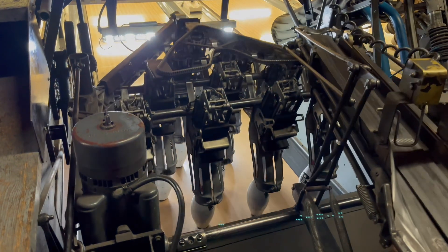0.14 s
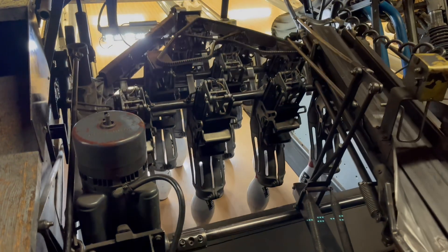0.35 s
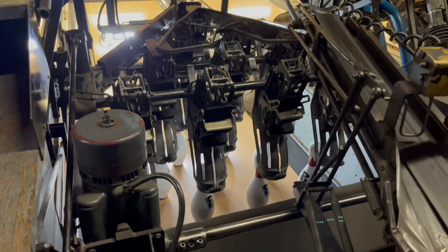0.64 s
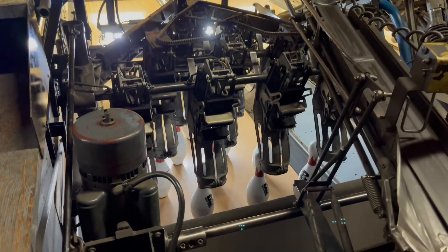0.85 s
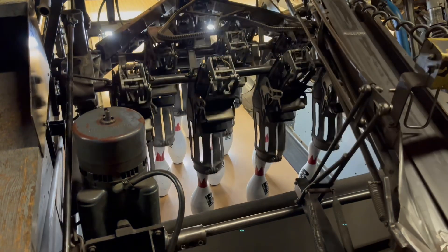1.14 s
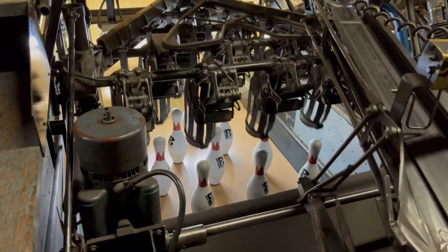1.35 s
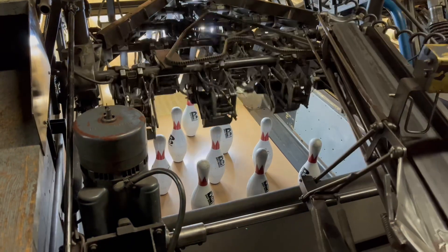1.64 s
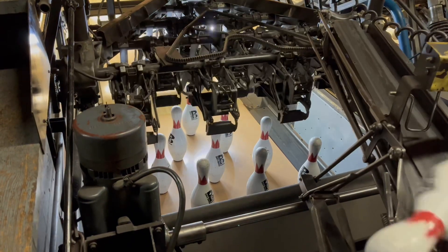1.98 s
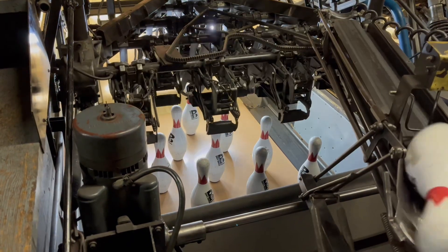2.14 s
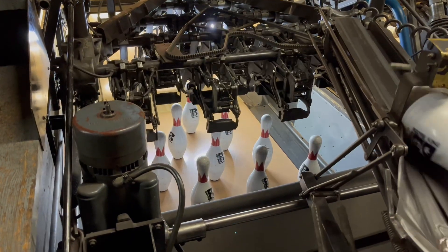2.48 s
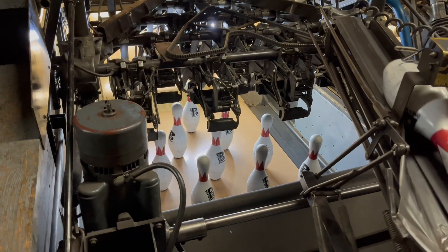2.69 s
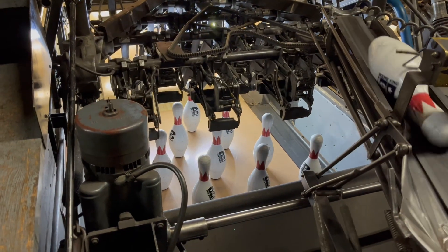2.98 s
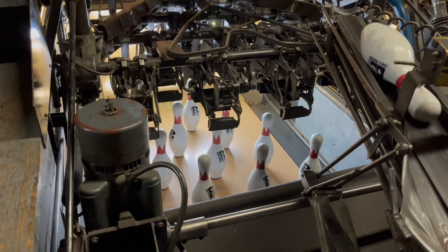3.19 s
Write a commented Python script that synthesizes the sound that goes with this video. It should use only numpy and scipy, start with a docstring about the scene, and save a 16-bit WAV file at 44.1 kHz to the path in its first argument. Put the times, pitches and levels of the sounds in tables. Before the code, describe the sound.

Bowling pinsetter in a hard machine room, close stereo microphone: early metal snaps, a ringing release, scraping deck, dense hollow pin knocks and low thuds, a brief rubbing squeal, drive rumble and rattle throughout.

```python
"""Steel latches clack on a bowling pinsetter, heard from on top of the machine: noise blows and clean rings.
Pins knock about in the pit behind, each a noise blow with three decaying tones.
One pin rubs and squeals up the conveyor: ringing chatter and wavering friction tones.
The deck lifts with a scrape and hiss of tiny contacts, a whistle and a squeak; heavy parts thud.
Beneath, shaped noise and chatter make the drive's rumble and rattle; tones and noise make the motor."""
import sys
import numpy as np
from scipy import signal
from scipy.fft import rfft, irfft, next_fast_len
from scipy.io import wavfile

SR = 44100
rng = np.random.default_rng(int(sys.argv[2]) if len(sys.argv) > 2 else 0)


def materialize(psi):
    """Save the field psi as 16-bit PCM at rate SR to the path in sys.argv[1].

    A 1-D psi becomes a single channel; in a 2-D psi each row is a channel.
    """
    bounded = np.clip(np.atleast_2d(psi).T, -1, 1)
    quanta = np.round(bounded * 32767).astype(np.int16)
    wavfile.write(sys.argv[1], SR, quanta)


N = 146412
TIME = np.arange(N) / SR


def from_db(db):
    """Decibels to gain."""
    return 10 ** (np.asarray(db) / 20)


def rms_one(x):
    """Scale to unit rms."""
    return x / np.sqrt(np.mean(x ** 2) + 1e-20)


def level(rows):
    """Gain over time from (t/s, level/dB) rows."""
    return from_db(np.interp(TIME, *np.transpose(rows)))


def at_hz(points, hz):
    """Read a table on a log-frequency axis."""
    f, v = np.transpose(points)
    return np.interp(np.log(hz + 1), np.log(f), v)


def noise():
    """White noise for the common and the differing part."""
    return rng.standard_normal((2, N))


def drift(rate):
    """Slow random wander, mostly below the rate in Hz; rms 1."""
    hz = np.arange(N // 2 + 1) * SR / N
    return rms_one(irfft(rfft(rng.standard_normal(N)) / (1 + (hz / rate) ** 2), N))


def colour(x, db_at):
    """Causal (minimum-phase) filter with the gain db_at(Hz)."""
    n = x.shape[-1]
    half = next_fast_len(n // 2 + SR // 20)
    hz = np.arange(half + 1) * SR / (2 * half)
    cepstrum = irfft(np.log(from_db(db_at(hz))))
    # fold the cepstrum forward in time, which makes the filter minimum-phase
    cepstrum[1:half] *= 2
    cepstrum[half + 1:] = 0
    return irfft(rfft(x, 2 * half) * np.exp(rfft(cepstrum)))[..., :n]


def shaped(x, spectrum):
    """Filter by a spectrum table; rms 1."""
    return rms_one(colour(x, lambda hz: at_hz(spectrum, hz)))


def above(hz, corner_hz):
    """Shelf shape: 0 below the corner, 1 above."""
    return 1 - 1 / (1 + (hz / corner_hz) ** 4)


PART_Q = 6.3  # sharpness of a part's own resonance


def peak(hz, centre_hz):
    """Shape of a part's own resonance, 1 at its centre."""
    return 1 / (1 + (PART_Q * (hz / centre_hz - 1)) ** 2)


def ring(x, modes):
    """Let x excite two-pole resonators, one per decaying mode."""
    out = 0
    for hz, db, t60 in modes:
        radius = from_db(-60 / (t60 * SR))
        turn = 2 * np.pi * hz / SR
        poles = [1, -2 * radius * np.cos(turn), radius * radius]
        out = out + from_db(db) * signal.lfilter([1, 0, -1], poles, x + 1e-18)
    return out


# ringing of the steel frame: f/Hz, relative drive level/dB, t60/s
FRAME_MODES = [(830, 16, 0.14), (1064, 9.5, 0.076), (1379, 9.5, 0.12), (1710, 5, 0.2), (2476, 2, 0.21),
               (3280, 0.5, 0.1), (3580, 3.5, 0.06), (3650, 3, 0.08), (4170, -5, 0.1), (4160, -3, 0.081),
               (4680, -11, 0.083), (4770, 2, 0.11)]


def with_frame(x, ring_db):
    """A sound plus the ringing it raises in the steel frame, set relative to the sound's own level."""
    return x + from_db(ring_db) * x.std() * rms_one(ring(x, FRAME_MODES))


def chatter(per_s, spread_db, t60):
    """Random small contacts, each a brief decaying burst of noise; rms 1."""
    contacts = rng.random(N) < per_s / SR
    strength = from_db(spread_db * np.minimum(rng.exponential(1, N), 3))
    energy_decay = from_db(-60 / (t60 * SR)) ** 2
    energy = signal.lfilter([1], [1, -energy_decay], contacts * strength ** 2 + 1e-12)
    return rms_one(np.sqrt(energy) * noise())


DIRECT_DB, DIRECT_S = -11, .0014  # the contact's click: level re the early burst, and delay


def blow(s, db, attack, t60, tail_db, tail_t60, db_at, direct_db=DIRECT_DB):
    """One blow: the direct contact, a dense burst of near reflections, then a tail in the machine room."""
    t = TIME[:SR // 2]
    early = (1 - np.exp(-t / attack)) * from_db(-60 * t / t60)
    tail = (1 - np.exp(-t / t60)) * from_db(tail_db - 60 * t / tail_t60)
    envelope = np.hypot(early, tail)
    force = envelope * rng.standard_normal((2, len(t)))
    force[0, int(DIRECT_S * SR)] += from_db(direct_db) * np.sqrt(np.sum(early ** 2))
    burst = colour(force, db_at)
    # the common part carries the energy of the envelope at the blow's level
    burst *= from_db(db) * np.sqrt(np.sum(envelope ** 2) / np.sum(burst[0] ** 2))
    return np.pad(burst, ((0, 0), (int(s * SR), N)))[:, :N]


RING_RISE_S = .0005


def struck(s, modes):
    """Clean ring of (f/Hz, level/dB, t60/s) modes from time s on, in the common part only."""
    t = np.maximum(TIME - s, 0)
    swell = 1 - np.exp(-t / RING_RISE_S)
    tones = sum(from_db(db - 60 * t / t60) * np.sin(2 * np.pi * hz * t) for hz, db, t60 in modes)
    return np.array([[1], [0]]) * swell * tones


SMEAR_S, SMEAR_HZ = 0.001984, 2920  # delay of the lowest bass; frequency where it has halved


def dispersed(x):
    """Bending waves carry the treble ahead of the bass, so a sharp contact is smeared a little."""
    hz = np.arange(N // 2 + 1) * SR / N
    delay = SMEAR_S / (1 + hz / SMEAR_HZ)
    return irfft(rfft(x) * np.exp(-2j * np.pi * np.cumsum(delay) * SR / N), N)


GRAIN_DB, GRAIN_HZ = 2.2, 45  # spread of the random gains, and their spacing in frequency


def grained(x):
    """Random fixed ripple over the spectrum, giving the noise a slightly tonal grain; rms 1."""
    grid = np.arange(1200) * GRAIN_HZ
    gains_db = GRAIN_DB * rng.standard_normal(len(grid))
    return rms_one(colour(x, lambda hz: np.interp(hz, grid, gains_db)))


UNEVEN_DB, UNEVEN_PER_S = 2.2, 16  # rms depth and rate of the swelling


def uneven(x):
    """The contact shifts as it slides, so each third-octave band swells and fades by itself; rms 1."""
    octave = np.log2(np.clip(np.arange(N // 2 + 1) * SR / N, 1000, 8000) / 1000)
    spectrum = rfft(x)
    out = 0
    for k in range(10):
        band = irfft(spectrum * np.maximum(1 - abs(3 * octave - k), 0), N)
        out = out + from_db(UNEVEN_DB * drift(UNEVEN_PER_S)) * band
    return rms_one(out)


FLUTTER_DB = 4.5  # largest swing of the level either way


def singing(hz, waver):
    """A friction tone that wavers in pitch by the given share and flutters in level; rms 1."""
    phase = 2 * np.pi * np.cumsum(hz * (1 + waver * drift(31))) / SR
    parts = [from_db(FLUTTER_DB * np.tanh(drift(35))) * np.sin(phase + turn) for turn in (0, np.pi / 2)]
    return rms_one(np.array(parts))


# steel latches and linkages: t/s, level/dB, body shelf/dB, top shelf/dB, attack/s, t60/s,
# the part's own resonance f/Hz, its height/dB, frame ringing re the blow/dB
LATCH_BLOWS = [(0.1843,-25,6,-1,0.00059,0.034,4060,3,-11), (0.1933,-10.5,3,1,0.0003,0.03,3950,7,-9),
               (0.2184,-12.5,10,4,0.00015,0.03,3350,6,-5), (0.321,-21,-0.5,2.5,0.001,0.12,1740,20.5,-13),
               (0.352,-26.5,13,-7,0.0011,0.052,3030,7,-21), (0.5866,-33.5,16.5,-10,0.0061,0.48,3240,4.5,-9),
               (1.135,-30.5,19,-20,0.0042,0.29,3020,3,-9), (1.238,-29,17,3,.002,0.12,1700,12,-6),
               (1.3755,-11.5,9,-10,0.0008,0.062,950,3,-15), (1.5902,-22.5,-32,-3,0.0011,0.11,5480,5,-8),
               (1.723,-17.5,7,5,0.0026,0.089,11500,2,-28), (1.7398,-8,7,-7,0.00015,0.012,4380,9,-22),
               (1.755,-28,12,-14,.001,0.053,2530,9,-12), (2.129,-24,-5,-11,0.0023,0.035,1650,-1,-3),
               (2.463,-26,8.5,-21,0.0029,0.16,2600,0,-11), (2.77,-30,-3,-18,.001,0.043,4480,2,-17),
               (3.0251,-40.5,12,6,.002,0.17,10500,21,-13), (3.1753,-20.5,19.5,-9,0.0012,0.093,1750,2,-3),
               (3.288,-32,6,-4,0.0035,0.066,2750,12,-14)]
# spectrum of a steel contact: f/Hz, relative level/dB per Hz
CLACK_SPECTRUM = [(100, -16.5), (400, -33), (1000, -10.5), (1700, -6.5), (2600, -1.5), (3800, -3),
                  (4900, -1), (6500, -4), (11000, -5.5), (14000, -11.5)]
BODY_HZ, TOP_HZ = 1980, 8400  # shelf corners
CLACK_TAIL_DB, CLACK_TAIL_T60_S = -3, 0.19
FULL_TAIL_T60_S = .07  # contacts shorter than this put less energy into the room
CLACK_RING_DB, CLACK_RING_T60_S = 3.5, .018  # clean ring of the struck part, level re its blow


def latches():
    """Hard steel contacts: each part has its own resonance and sets the frame ringing."""
    out = 0
    for s, db, body, top, attack, t60, part_hz, part_db, ring_db in LATCH_BLOWS:
        def tone(hz):
            shelves = body * (1 - above(hz, BODY_HZ)) + top * above(hz, TOP_HZ)
            return at_hz(CLACK_SPECTRUM, hz) + shelves + part_db * peak(hz, part_hz)
        tail_db = CLACK_TAIL_DB + 10 * np.log10(min(t60 / FULL_TAIL_T60_S, 1))
        out = out + with_frame(blow(s, db, attack, t60, tail_db, CLACK_TAIL_T60_S, tone), ring_db)
        out = out + struck(s, [(part_hz, db + CLACK_RING_DB, CLACK_RING_T60_S)])
    return out


# modes of the deck's release catch: f/Hz, level/dB, t60/s
RELEASE_MODES = [(415,-19.5,.15), (656,-25,0.15), (1170,-28,.07), (1360,-38,.12), (2277,-31,.12),
                 (3020,-23,0.12), (3500,-21,0.11), (4700,-14,0.067)]
RELEASE_S = 1.3765


def release_catch():
    """The deck's release catch lets go and rings as a set of decaying sines."""
    return struck(RELEASE_S, RELEASE_MODES)


# pins knocking on each other and on the machine: t/s, level/dB, bass shelf/dB, edge shelf/dB,
# attack/s, t60/s, strongest resonance f/Hz
PIN_BLOWS = [(0.2214,-16.5,-3,3,0.0017,0.064,1000), (0.4516,-24,-8,-5,0.0022,0.17,823),
             (.478,-20,-4,-11,0.0031,0.14,700), (.526,-27,4,-11,0.0015,0.11,880),
             (1.245,-28,-2,2,0.0038,0.14,800), (1.313,-20,9,-23,0.0022,0.08,790),
             (1.377,-16.5,0,0,0.002,0.16,865), (1.4141,-17,-5,-4.5,0.0013,0.12,720),
             (1.5122,-9.5,-3.5,-11.5,0.0021,0.08,728), (1.5606,-14,2,-7,0.0013,0.11,595),
             (1.7403,-18,-1,-5,0.001,0.1,850), (1.754,-18,-1,-2,0.0025,0.18,700),
             (1.969,-17.5,9,14,0.0017,.04,368), (2.0545,-11,-4,-3,0.004,0.072,1007),
             (2.1113,-12,7.5,-3,0.0018,0.17,270), (2.131,-14.5,2,2.5,0.0012,0.11,550),
             (2.224,-19.5,9,-14,.001,0.022,690), (2.2643,-12.5,5,-4.5,0.00073,0.1,892),
             (2.415,-19.5,10,-25,0.0022,0.13,1120), (2.4613,-9,7.5,-7,0.0016,0.065,446),
             (2.4848,-11.5,-6,-17,0.00045,0.11,823), (2.532,-16,-20,-26,0.0025,0.049,484),
             (2.592,-18,-15,-3,0.0029,0.029,750), (2.644,-19,0,-8,0.0059,0.27,760),
             (2.766,-10,10.5,-1,0.003,0.038,283), (3.02,-20,-2,-7,0.0022,.1,820),
             (3.178,-17.5,-14,4,0.0018,0.15,1060)]
# spectrum of a knock: f/Hz, relative level/dB per Hz
KNOCK_SPECTRUM = [(60, -36), (170, -12), (320, -1), (600, -0.5), (850, -3), (1300, -3), (2000, -10.5),
                  (3500, -18.5), (8000, -33)]
# clean ring of a pin: multiple of the strongest resonance, level re the blow/dB, t60/s
PIN_RING = [(1, -1, .045), (.63, -4, .055), (1.37, -5, .035)]
BASS_HZ, EDGE_HZ = 396, 1400  # shelf corners
PIN_RESONANCE_DB = 5.5
KNOCK_TAIL_DB, KNOCK_TAIL_T60_S = -5, 0.46


def pins():
    """Hollow knocks of plastic-coated wood: each pin's resonances ring on after the blow."""
    out = 0
    for s, db, bass, edge, attack, t60, part_hz in PIN_BLOWS:
        def tone(hz):
            shelves = bass * (1 - above(hz, BASS_HZ)) + edge * above(hz, EDGE_HZ)
            return at_hz(KNOCK_SPECTRUM, hz) + shelves + PIN_RESONANCE_DB * peak(hz, part_hz)
        out = out + blow(s, db, attack, t60, KNOCK_TAIL_DB, KNOCK_TAIL_T60_S, tone)
        modes = [(part_hz * ratio, db + mode_db, mode_t60) for ratio, mode_db, mode_t60 in PIN_RING]
        out = out + struck(s, modes)
    return out


# the pin's squeal: t/s, f/Hz, level/dB
SQUEAL_GLIDE = [(2.25,1120,-100), (2.32,1122,-32), (2.45,1130,-35), (2.59,1122,-31), (2.65,1072,-24.5),
                (2.71,1092,-25.5), (2.74,1115,-30), (2.77,1132,-22), (2.81,1145,-24), (2.86,1138,-32),
                (2.91,1125,-44), (2.98,1128,-34), (3.13,1120,-37), (3.25,1120,-70)]
# the weaker tone above it: t/s, level/dB
UPPER_TONE_LEVEL = [(2.3,-100), (2.4,-41), (2.5,-42), (2.61,-44), (2.67,-28), (2.72,-35), (2.9,-73)]
UPPER_HZ = 1215
SQUEAL_WAVER = .016  # rms share of the pitch


def pin_squeal():
    """Friction of a pin on the conveyor guide: a gliding squeal and a weaker tone above it."""
    s, hz, db = np.transpose(SQUEAL_GLIDE)
    squeal = from_db(np.interp(TIME, s, db)) * singing(np.interp(TIME, s, hz), SQUEAL_WAVER)
    upper = level(UPPER_TONE_LEVEL) * singing(UPPER_HZ, SQUEAL_WAVER)
    return squeal + upper


# a pin rubbing on the conveyor: t/s, level before trim/dB
PIN_RUB_LEVEL = [(2.2,-60), (2.35,-36), (2.56,-36), (2.66,-21), (2.73,-25.5), (2.78,-24.5), (2.9,-34),
                 (3.03,-26.5), (3.32,-38)]
# its resonances: f/Hz, relative drive level/dB, t60/s
RUB_MODES = [(1082, -2, 0.15), (1180, -8, 0.12), (1173, 11, 0.019)]
# overall tone of the rub: f/Hz, gain/dB
RUB_TONE = [(400,-7), (900,6.5), (1300,-14.5), (2000,-2), (10000,-60)]
RUB_TRIM_DB = -4


def pin_rub():
    """Rough rubbing: small contacts excite resonances as the pin goes up the conveyor."""
    rough = ring(chatter(per_s=67, spread_db=3.0, t60=0.068), RUB_MODES)
    return from_db(RUB_TRIM_DB) * level(PIN_RUB_LEVEL) * shaped(rough, RUB_TONE)


# steel deck sliding: t/s, level before trim/dB
SCRAPE_LEVEL = [(0,-48.5), (.2,-45.5), (.36,-36.5), (.56,-49), (.7,-41.5), (.88,-49), (.96,-40.5),
                (1.09,-44), (1.15,-36), (1.5,-47), (1.63,-27.5), (1.76,-31.5), (1.88,-24.5), (2.03,-33.5),
                (2.14,-31.5), (2.22,-38), (2.29,-31.5), (2.4,-45), (2.74,-48), (2.88,-37.5), (2.98,-47),
                (3.05,-41.5), (3.09,-45), (3.15,-38), (3.32,-41)]
# spectrum of the grind: f/Hz, relative level/dB per Hz
SCRAPE_SPECTRUM = [(300, -13.5), (1000, 0.5), (1800, 1.5), (2700, 2), (4500, 0), (6000, -7), (7500, -8),
                   (10000, -57), (15000, -59)]
SCRAPE_TRIM_DB, SCRAPE_RING_DB = -0.5, -11.5  # ringing re the scrape
TICKS_PER_S, TICK_DB = 55, -8  # tick level re the grind


def deck_scrape():
    """Steel slides on steel: an uneven grind with small ticks sets the frame ringing."""
    grind = uneven(grained(shaped(chatter(per_s=1400, spread_db=-2.5, t60=0.1), SCRAPE_SPECTRUM)))
    ticks = grained(shaped(chatter(TICKS_PER_S, spread_db=1.5, t60=0.018), CLACK_SPECTRUM))
    scrape = from_db(SCRAPE_TRIM_DB) * level(SCRAPE_LEVEL) * (grind + from_db(TICK_DB) * ticks)
    return with_frame(scrape, SCRAPE_RING_DB)


# hiss of the sliding deck: t/s, level before trim/dB
DECK_HISS_LEVEL = [(0,-66), (.17,-58), (.33,-41), (.45,-58.5), (.88,-60), (.96,-44.5), (1.08,-51),
                   (1.24,-48), (1.56,-41.5), (1.66,-30.5), (1.76,-33), (1.83,-25.5), (2.14,-44.5),
                   (2.22,-50), (2.29,-40.5), (2.4,-62), (2.55,-64), (2.63,-56), (2.72,-64), (3.32,-55.5)]
# its spectrum: f/Hz, relative level/dB per Hz
HISS_SPECTRUM = [(2000, -24), (6500, -7), (9300, -3.5), (11200, -1.5), (13500, -8), (16000, -5)]
HISS_TRIM_DB = 2.5


def deck_hiss():
    """Very many tiny scraping contacts merge into a hiss."""
    contacts = chatter(per_s=1900, spread_db=3.5, t60=0.073)
    hiss = grained(shaped(contacts, HISS_SPECTRUM))
    return from_db(HISS_TRIM_DB) * level(DECK_HISS_LEVEL) * hiss


# thin steel whistle as the deck starts to lift: t/s, level/dB
DECK_WHISTLE_LEVEL = [(1.36, -100), (1.42, -50), (1.46, -46), (1.53, -49), (1.62, -100)]
# its resonances: f/Hz, relative drive level/dB, t60/s
WHISTLE_MODES = [(11500, -5, .012), (11500, 1, .012)]


def deck_whistle():
    """Noise excites a high steel resonance for a moment."""
    return level(DECK_WHISTLE_LEVEL) * rms_one(ring(noise(), WHISTLE_MODES))


# thin steel squeak near the end: t/s, level/dB
DECK_SQUEAK_LEVEL = [(3.0,-100), (3.1,-43), (3.16,-45), (3.25,-48), (3.32,-51)]


def deck_squeak():
    """A faint, high friction tone of sliding steel."""
    return level(DECK_SQUEAK_LEVEL) * singing(hz=3300, waver=.012)


# heavy thuds through the frame: t/s, level/dB, t60/s
THUD_BLOWS = [(0.205, -26.5, 0.47), (1.161, -24.5, 0.18), (2.053, -8, 0.095), (2.092, -18.5, 0.13),
              (2.790, -26, .25), (3.139, -14.5, 0.19)]
# their spectrum: f/Hz, relative level/dB per Hz
THUD_SPECTRUM = [(28, -42), (55, -20), (100, -1.5), (140, -3), (220, -17.5), (600, -24), (3000, -79)]


def thuds():
    """Heavy parts come to rest and shake the frame, giving low, soft-edged blows."""
    def tone(hz):
        return at_hz(THUD_SPECTRUM, hz)
    return sum(blow(s, db, attack=0.0068, t60=t60, tail_db=-16, tail_t60=0.25, db_at=tone, direct_db=0)
               for s, db, t60 in THUD_BLOWS)


# loose linkages: t/s, level before trim/dB
DRIVE_RATTLE_LEVEL = [(0.0, -35.5), (0.25, -37.5), (0.4, -35), (0.52, -31), (0.85, -44.5), (1.16, -42),
                      (1.32, -30.5), (1.44, -32), (1.56, -30.5), (1.98, -29), (2.17, -23), (2.24, -26),
                      (2.31, -23.5), (2.52, -39.5), (2.66, -28), (2.82, -28), (2.93, -29.5), (3.04, -26),
                      (3.32, -29)]
# their spectrum: f/Hz, relative level/dB per Hz
RATTLE_SPECTRUM = [(80, -30), (190, 0), (300, 3), (450, 1), (750, -1.5), (1100, -7.5), (1500, -10),
                   (2200, -17.5), (4000, -29), (9000, -82)]
RATTLE_TRIM_DB = 1


def drive_rattle():
    """Loose linkages in the drive rattle: random contacts with short decays."""
    contacts = chatter(per_s=260, spread_db=-1.0, t60=0.11)
    return from_db(RATTLE_TRIM_DB) * level(DRIVE_RATTLE_LEVEL) * shaped(contacts, RATTLE_SPECTRUM)


# belts: t/s, level before trim/dB
DRIVE_RUMBLE_LEVEL = [(0.0, -48), (0.17, -38.5), (0.36, -34.5), (0.58, -33.5), (1.01, -45.5), (1.53, -38),
                      (2.01, -43.5), (2.17, -34.5), (2.53, -39), (2.81, -34), (3.0, -27), (3.32, -30.5)]
# their spectrum: f/Hz, relative level/dB per Hz
RUMBLE_SPECTRUM = [(20, -65), (32, -27), (48, -11), (65, 5), (110, 2), (170, 1), (260, -3.5), (600, -11.5),
                   (2000, -64)]
RUMBLE_TRIM_DB = 1.5


def drive_rumble():
    """Belts in the drive rumble: low noise that swells and fades."""
    return from_db(RUMBLE_TRIM_DB) * level(DRIVE_RUMBLE_LEVEL) * shaped(noise(), RUMBLE_SPECTRUM)


# tones of the motor: f/Hz, centre level/dB
HUM_TONES = [(114, -49.5), (290, -38.5), (581, -49), (721, -71.5)]


def motor_hum():
    """Tones of the motor waver slightly in pitch and level."""
    hum = 0
    for hz, db in HUM_TONES:
        phase = 2 * np.pi * np.cumsum(hz * (1 + 0.0081 * drift(5.8))) / SR
        hum = hum + from_db(db + 1.3 * drift(1.1)) * np.sqrt(2) * np.sin(phase)
    return hum * np.array([[1], [.6]])  # common and differing share


# drone of the motor: f/Hz, relative level/dB per Hz
DRONE_SPECTRUM = [(40, -34), (150, -2), (300, 2), (550, -1.5), (1000, -10), (3000, -18.5), (12000, -40)]
DRONE_DB = -39


def motor_drone():
    """Steady shaped noise under the hum."""
    return from_db(DRONE_DB) * shaped(noise(), DRONE_SPECTRUM)


# spread over the two sides: f/Hz, left-right likeness (1 = the same)
SIDE_LIKENESS = [(60, .98), (125, .95), (250, .89), (500, .76), (700, .6), (1000, .1), (1400, .05),
                 (2000, .28), (4000, .36), (11000, .84)]
# f/Hz, left minus right/dB
SIDE_BALANCE = [(60, 0.5), (500, 2), (1000, 1.9), (2000, 1.5), (4500, 4.5), (8000, -0.5), (12000, 0)]


def scene():
    """Each source has a common and a differing part, which spread to left and right."""
    contacts = dispersed(latches() + release_catch() + pins())
    conveyor = pin_squeal() + pin_rub()
    deck = deck_scrape() + deck_hiss() + deck_whistle() + deck_squeak()
    drive = drive_rattle() + drive_rumble()
    motor = motor_hum() + motor_drone()
    common, differing = rfft(contacts + conveyor + deck + thuds() + drive + motor, N + SR)
    hz = np.linspace(0, SR / 2, len(common))
    alike = np.clip(at_hz(SIDE_LIKENESS, hz), -.99, .99)
    lean = at_hz(SIDE_BALANCE, hz) / 2
    side = differing * np.sqrt((1 - alike) / (1 + alike))
    left = (common + side) * from_db(lean)
    right = (common - side) * from_db(-lean)
    return irfft(np.array([left, right]))[:, :N]


# overall response with a deep notch near 8 kHz and a falling top: f/Hz, gain/dB
OVERALL_RESPONSE = [(7000, 0.5), (7600, -5.5), (8200, -44), (8700, -18), (9200, -1), (13600, 2),
                    (14700, -15), (16000, -34)]
RIGHT_LAG_S = .00002
STOP_HZ = 16600  # from here up the top is at least 70 dB down


def record(dry):
    """Overall response with a deep notch near 8 kHz; the right lags slightly; peaks clip, the top is cut."""
    left, right = colour(dry, lambda hz: at_hz(OVERALL_RESPONSE, hz))
    hz = np.arange(N // 2 + 1) * SR / N
    late_right = irfft(rfft(right) * np.exp(-2j * np.pi * hz * RIGHT_LAG_S), N)
    clipped = np.clip(np.array([left, late_right]), -.92, .92)
    top_cut = signal.cheby2(12, 70, STOP_HZ, fs=SR, output="sos")
    return signal.sosfilt(top_cut, clipped)


dry = scene()
out = record(dry)
materialize(out)
```